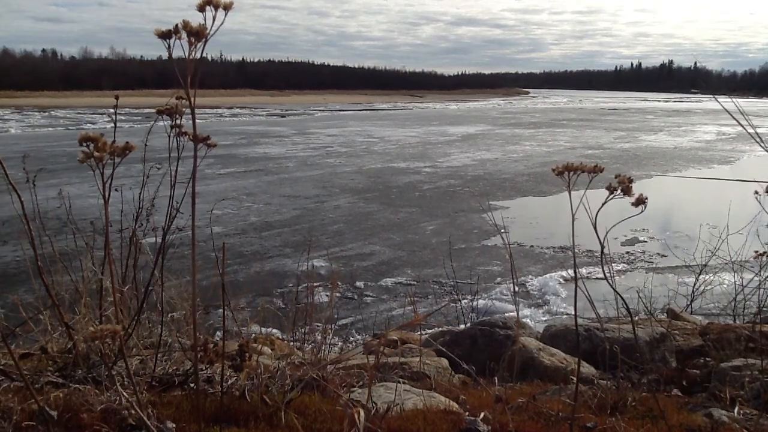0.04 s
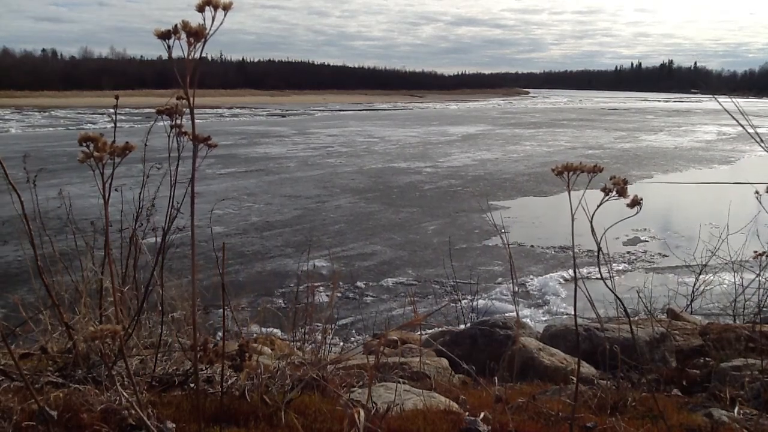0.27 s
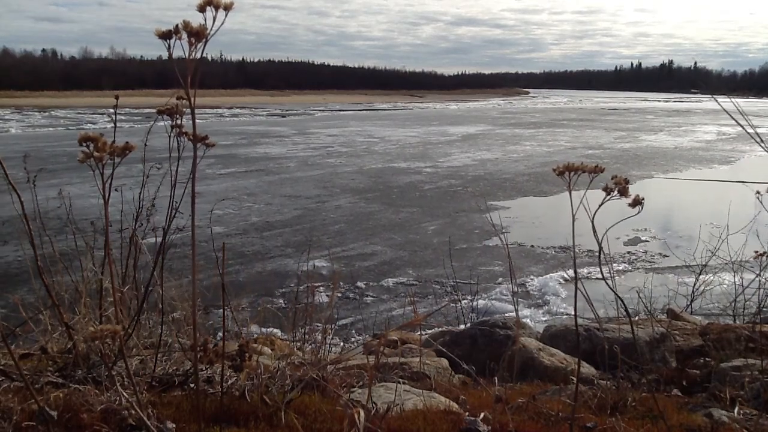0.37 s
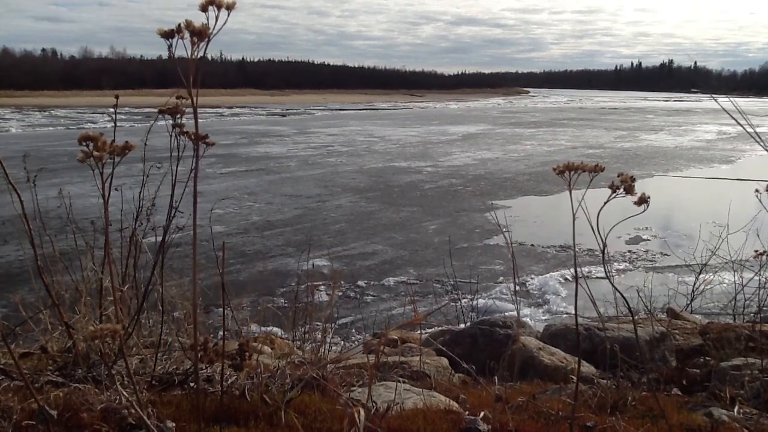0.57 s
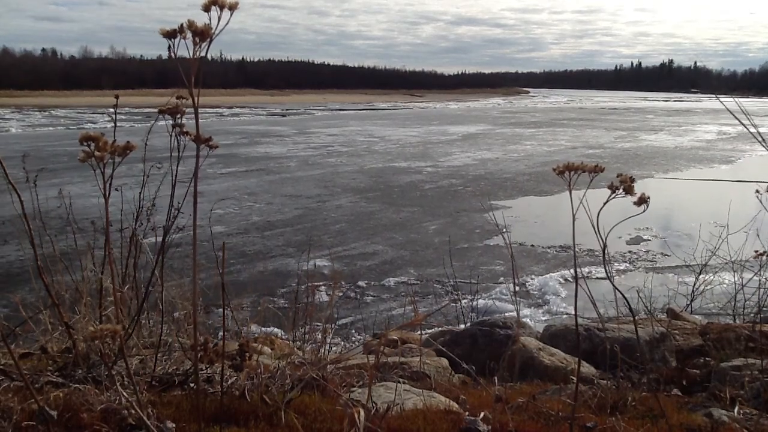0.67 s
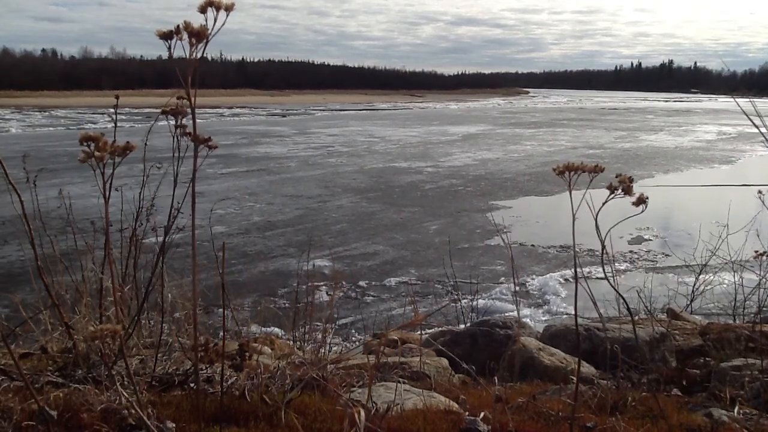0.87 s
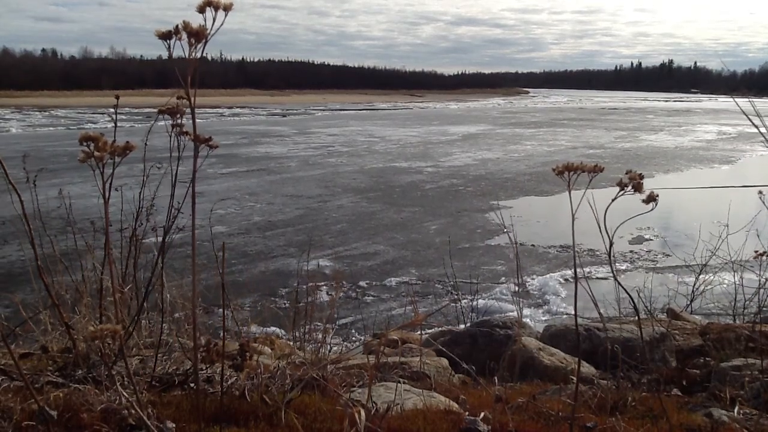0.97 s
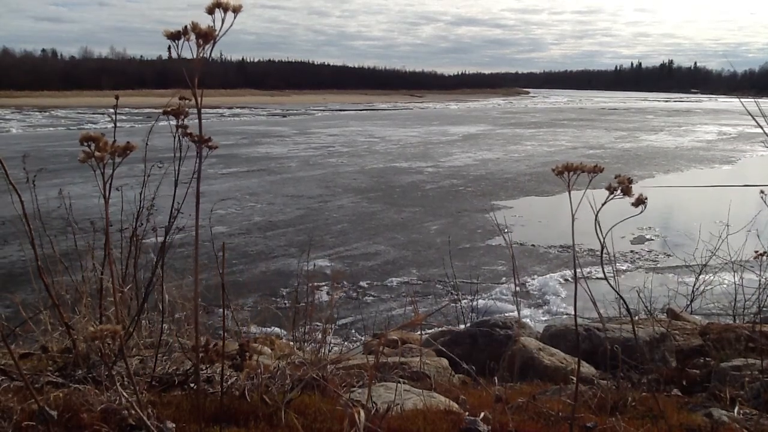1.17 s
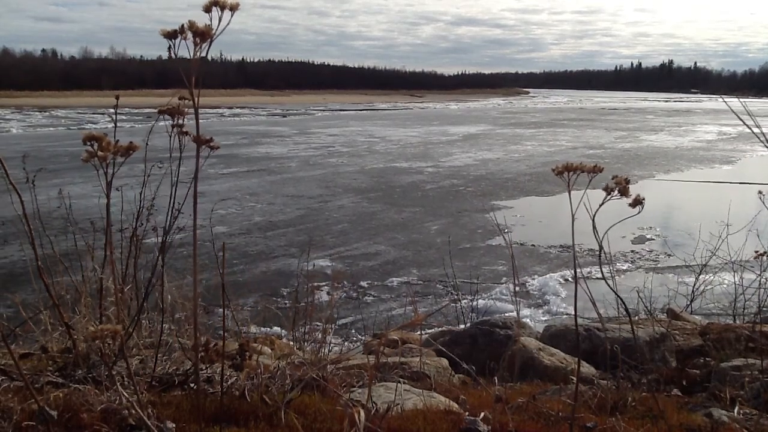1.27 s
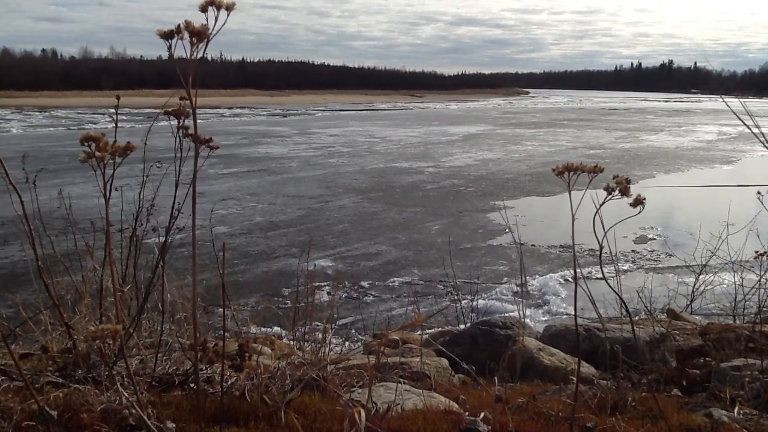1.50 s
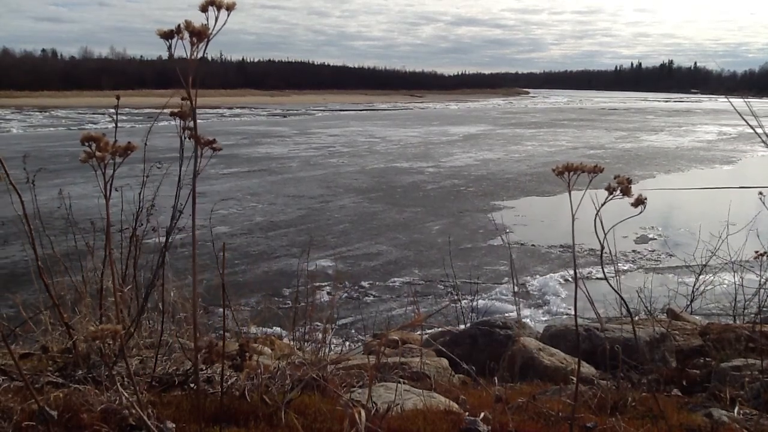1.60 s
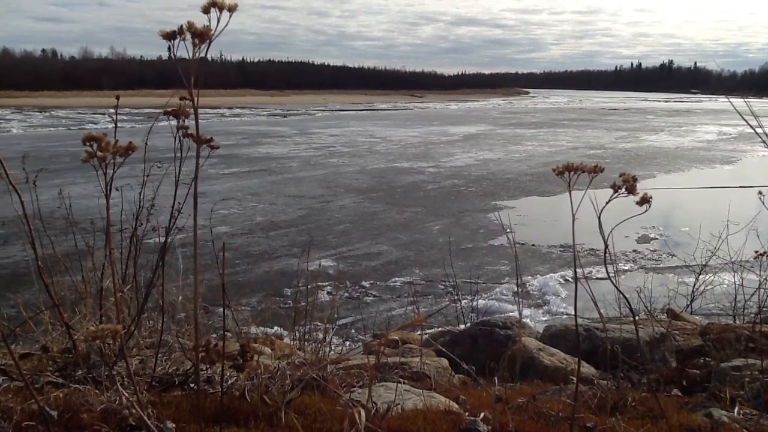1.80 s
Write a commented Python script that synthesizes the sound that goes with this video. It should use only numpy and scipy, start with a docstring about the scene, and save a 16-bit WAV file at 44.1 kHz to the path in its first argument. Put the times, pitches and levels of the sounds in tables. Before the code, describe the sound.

Drifting river ice snaps and crackles while wind gusts rumble on the microphone.

```python
"""Thin ice drifts along a river bank: plates snap in sharp, ringing ticks, and their edges grind in
swells of fine crackle. Air pockets under the ice plop twice and the river hisses faintly.
Gusts of wind buffet the microphone in low, booming lumps, and single eddies thump against it."""
import sys
import numpy as np
from scipy import signal
from scipy.fft import rfft, irfft
from scipy.io import wavfile
from scipy.ndimage import uniform_filter1d

SR = 44100
rng = np.random.default_rng(int(sys.argv[2]) if len(sys.argv) > 2 else 0)


def generate_wav(signal):
    """Clip the signal to [-1, 1] and save it as 16-bit WAV at the path in sys.argv[1]."""
    frames = np.transpose(np.atleast_2d(signal))
    scaled = np.clip(frames, -1, 1) * 32767
    pcm = np.round(scaled).astype(np.int16)
    wavfile.write(sys.argv[1], SR, pcm)


N = 81585
TIME = np.arange(N) / SR


def from_db(db):
    """Decibels to gain."""
    return 10 ** (np.asarray(db) / 20)


def unit_rms(x):
    """Scale to unit power."""
    return x / np.sqrt(np.mean(x ** 2) + 1e-20)


def eq_gain(colour, hz):
    """The gain of an EQ curve drawn on a log-frequency axis."""
    points_hz, points_db = np.transpose(colour)
    return from_db(np.interp(np.log(hz), np.log(points_hz), points_db))


def band(x, edges_hz, order=2):
    """Butterworth band-pass."""
    return signal.sosfilt(signal.butter(order, edges_hz, "band", fs=SR, output="sos"), x + 1e-18)


def noise(colour):
    """Steady noise shaped by an EQ curve, at unit power."""
    hz = np.maximum(np.fft.rfftfreq(N, 1 / SR), 1)
    return unit_rms(irfft(rfft(rng.standard_normal(N)) * eq_gain(colour, hz), N))


def drift(rate_hz):
    """Random wander of unit spread, mostly slower than rate_hz."""
    hz = np.fft.rfftfreq(N, 1 / SR)
    return unit_rms(irfft(rfft(rng.standard_normal(N)) / (1 + (hz / rate_hz) ** 2), N))


def resonance(x, hz, width_hz):
    """One resonance with unit gain at its peak."""
    r = np.exp(-np.pi * width_hz / SR)
    feedback = [1, -2 * r * np.cos(2 * np.pi * hz / SR), r * r]
    return signal.lfilter(np.array([1, 0, -1]) * (1 - r * r) / 2, feedback, x + 1e-18)


def levelled(x, window_s=0.013):
    """Ride out swings of level slower than the window, about one lump of wind."""
    size = int(window_s * SR)
    return x / np.sqrt(uniform_filter1d(uniform_filter1d(x * x, size), size) + 1e-9)


# Tone of the river's hiss: frequency_hz, gain_db
RIVER_EQ = [(40, 7), (140, -4), (300, 3.5), (550, -0.5), (1100, -7.5), (2500, -8), (6000, -11.5),
            (10500, -22), (15500, -18)]


def river():
    """Flowing water lays a faint, steady bed of hiss."""
    return from_db(-57) * noise(RIVER_EQ)


# Tone of the wind's rumble: frequency_hz, gain_db
WIND_EQ = [(40, -16), (90, -2.5), (170, 5), (260, 0), (350, -11.5), (500, -31), (800, -50.5)]
# Gusts on the microphone: start_s, hold_s, level_db
GUSTS = [(0.105, 0.028, -53), (0.193, 0.021, -40), (0.265, 0.026, -38.5), (0.321, 0.031, -37),
         (0.384, 0.047, -34.5), (0.489, 0.021, -36.5), (0.553, 0.028, -34.5), (0.639, 0.042, -38),
         (0.701, 0.078, -32), (0.813, .065, -40.5), (0.925, 0.058, -35.5), (1.011, 0.046, -37),
         (1.093, 0.095, -41.5), (1.669, 0.032, -45), (1.792, 0.023, -50.5)]


def wind():
    """Each gust swells, holds and dies as a lumpy rumble that booms in the microphone."""
    attack_s, release_s = 0.0039, 0.019
    breeze_db, strong_gust_db, eddy_growth = -63.5, -30, 2.06
    power = from_db(breeze_db) ** 2
    for start_s, hold_s, level_db in GUSTS:
        fade_in = (np.maximum(start_s - TIME, 0) / attack_s) ** 2
        fade_out = np.maximum(TIME - start_s - hold_s, 0) / release_s
        power = power + (from_db(level_db) * np.exp(-np.minimum(fade_in + fade_out, 20))) ** 2
    gust_db = 10 * np.log10(power)
    lumps = from_db(3 * np.clip(drift(rate_hz=89), -2, 2))
    rumble = from_db(gust_db - 4) * levelled(noise(WIND_EQ))
    # Strong gusts shed smaller eddies, so they sound brighter.
    eddy_gain = from_db(-36.5 + eddy_growth * (gust_db - strong_gust_db)) * lumps
    eddies = levelled(unit_rms(band(rng.standard_normal(N), edges_hz=(240, 391), order=3)))
    pressure = lumps * (rumble + eddy_gain * eddies)
    boom = from_db(2.5) * resonance(pressure, hz=142.5, width_hz=104)
    return pressure + boom


# Single eddies hitting the microphone: centre_s, peak_db, pulse_width_s
EDDY_HITS = [(0.27, -26.5, 0.00061), (0.353, -22.5, 0.00064), (0.394, -23, .0006), (0.507, -18, 0.00056),
             (.565, -25.5, 0.00098), (.643, -23.5, 0.00049), (.663, -20.5, 0.0007), (0.742, -18, 0.00053),
             (0.7596, -15.5, 0.00066), (0.972, -17.5, 0.00055), (1.001, -16.5, 0.00068),
             (1.056, -28, 0.0006), (1.1, -26.5, 0.00066)]


def thumps():
    """An eddy bursts on the microphone as one push and pull of pressure, ringing a low knock."""
    out = 0
    for centre_s, peak_db, pulse_width_s in EDDY_HITS:
        phase = (TIME - centre_s) / pulse_width_s
        pulse = -phase * np.exp(-np.minimum(phase ** 2 / 2, 20))
        pitch_hz = 181 * (1 + rng.uniform(-0.088, 0.088))
        knock = resonance(pulse, pitch_hz, width_hz=97)
        out = out + from_db(peak_db) * knock / np.abs(knock).max()
    return out


# Water plops under the ice: start_s, level_db, pitch_hz
AIR_POCKETS = [(1.4200, -40.5, 625), (1.7719, -31.5, 646)]


def plops():
    """A pocket of air under the ice swings for a cycle or two."""
    out, rise_s = 0, 0.00067
    for start_s, level_db, pitch_hz in AIR_POCKETS:
        age = np.maximum(TIME - start_s, 0)
        envelope = age / rise_s * np.exp(1 - age / rise_s)
        out = out + from_db(level_db) * envelope * np.sin(2 * np.pi * pitch_hz * age)
    return out


# Tone of the crackle: frequency_hz, gain_db
CRACKLE_EQ = [(400, -6), (900, 0), (1500, -0.5), (2500, -8), (4000, -3.5), (5600, 2.5), (8000, 3),
              (10500, 2.5), (13500, -16), (15500, -2)]
# Swells of the grinding ice edges: time_s, level_db
GRIND_SWELLS = [(0, -55.5), (.11, -64.5), (.28, -60.5), (.4, -67), (.52, -56.5), (.7, -62.5), (.82, -49.5),
                (.91, -56.5), (.98, -51), (1.21, -58), (1.255, -48.5), (1.31, -61), (1.49, -55.5),
                (1.517, -47), (1.55, -50), (1.585, -42.5), (1.632, -52.5), (1.68, -62), (1.85, -71.5)]


def grinding():
    """Countless small shards tick at their own pitches, over the fizz of those too small to tell apart."""
    grains_per_s, spread_db, ring_cycles = 1300, 4, 3.6
    level_db = np.interp(TIME, *np.transpose(GRIND_SWELLS))
    density = from_db(.5 * (level_db - level_db.mean()))   # harder grinding packs in more grains
    onsets = rng.random(N) < grains_per_s * density / SR
    sizes = from_db(spread_db * np.minimum(rng.exponential(1, N), 4)) * rng.choice([-1, 1], N)
    clicks = onsets * sizes / np.sqrt(density)
    pitches_hz = np.linspace(1300, 11500, 14)
    pitch_index = rng.integers(0, len(pitches_hz), N)
    grains = 0
    for k, hz in enumerate(pitches_hz):
        ticks = resonance(clicks * (pitch_index == k), hz, width_hz=2 * hz / ring_cycles)
        grains = grains + eq_gain(CRACKLE_EQ, hz) / np.sqrt(hz) * ticks
    crackle = from_db(1.5) * unit_rms(band(grains, edges_hz=(1060, 16000)))
    fizz = from_db(0.46) * noise(CRACKLE_EQ)
    return from_db(level_db) * (crackle + fizz)


# Snapping ice plates: start_s, level_db, ring_hz, body_trim_db
ICE_SNAPS = [(.0057,-30.5,6500,-9.5), (0.0812,-38.5,8800,-11), (0.3673,-40,7250,-4.5), (.406,-44,8300,-8),
             (.464,-39,9400,-9), (0.4772,-31,5600,-12.5), (0.521,-27,6800,-11), (0.6151,-25.5,6200,-6),
             (.6205,-30,6230,-7), (0.6779,-35.5,10300,-15), (.718,-38.5,9700,-6.5), (.731,-32.5,7500,-17),
             (0.735,-33.5,8600,-13), (0.8226,-32,7340,-13), (.8268,-32,7600,-7.5), (0.8493,-34.5,6500,-1.5),
             (0.8668,-35,7350,1), (0.8815,-32,10600,-8), (0.89,-37,9400,-15), (0.962,-35,8800,-21),
             (0.9875,-28,7640,-18), (1.0614,-27.5,5140,-19), (1.0846,-21,10200,-14.5),
             (1.1446,-24.5,9800,-9.5), (1.1969,-31.5,9050,-20), (1.232,-22,5340,-17), (1.243,-33,7100,-7),
             (1.2569,-29.5,7600,-22), (1.3046,-25,6650,-18), (1.3261,-38,7300,-12),
             (1.3434,-34.5,10900,-10.5), (1.485,-33.5,6350,-7.5), (1.5063,-25,5650,-12.5),
             (1.561,-33,5800,-26), (1.5661,-26,6240,-18), (1.585,-30,7900,-4.5), (1.6331,-45.5,6060,5)]


def ice_snaps():
    """Tiny fractures lead up to one clean break that rings the shard, splinters and knocks the plate."""
    lead_s, lead_fade_s, rise_s, crumble_s = .003, 0.0022, 0.00016, 0.0051
    out = np.zeros(N + SR)
    t = TIME[:SR // 25] - lead_s
    age = np.maximum(t, 0)
    attack = (1 - np.exp(-age / rise_s)) ** 2
    crumble = from_db(-22) * np.exp(-age / crumble_s)
    fractures = from_db(-24.5) * np.exp(-np.abs(t) / lead_fade_s)
    trim = np.sqrt(.004 * SR / len(t))   # level is set as if the energy fell within 4 ms
    for start_s, level_db, ring_hz, body_trim_db in ICE_SNAPS:
        decay_s = 0.00031 + 0.0016 * from_db(body_trim_db)   # a break through the whole plate lasts longer
        envelope = attack * (np.exp(-age / decay_s) + crumble) + fractures
        envelope[int((lead_s + rise_s) * SR)] += from_db(5)   # the hard click of the break
        bursts = rng.choice([-1, 1], (3, len(t))) * envelope
        ring = from_db(-11) * unit_rms(resonance(bursts[0], ring_hz, width_hz=800))
        splinters = from_db(-10) * unit_rms(band(bursts[1], edges_hz=(5380, 10800)))
        body = from_db(body_trim_db - 5) * unit_rms(band(bursts[2], edges_hz=(400, 4760)))
        first = max(int((start_s - lead_s) * SR), 0)
        out[first:first + len(t)] += from_db(level_db) * trim * (ring + splinters + body)
    return out[:N]


def scene():
    """Ice, water and wind in a mono mix, out in the open."""
    return (ice_snaps() + grinding() + plops() + wind() + thumps() + river())[None]


def record(dry):
    """The microphone sheds the deepest bass; the top is cut steeply."""
    low_cut_hz, high_cut_hz = 74, 15600
    thinned = signal.sosfilt(signal.butter(3, low_cut_hz, "high", fs=SR, output="sos"), dry)
    return signal.sosfilt(signal.ellip(10, .2, 80, high_cut_hz, fs=SR, output="sos"), thinned)


dry = scene()
out = record(dry)
generate_wav(out)
```